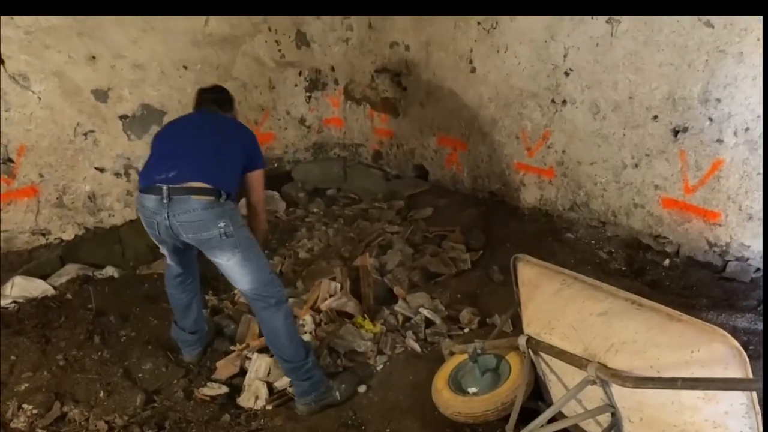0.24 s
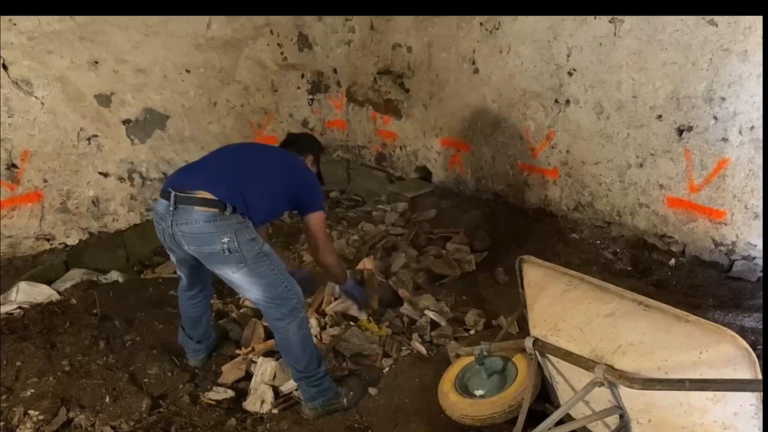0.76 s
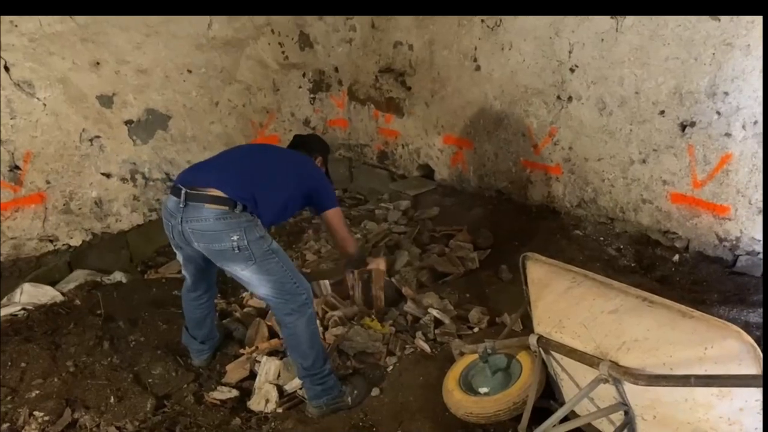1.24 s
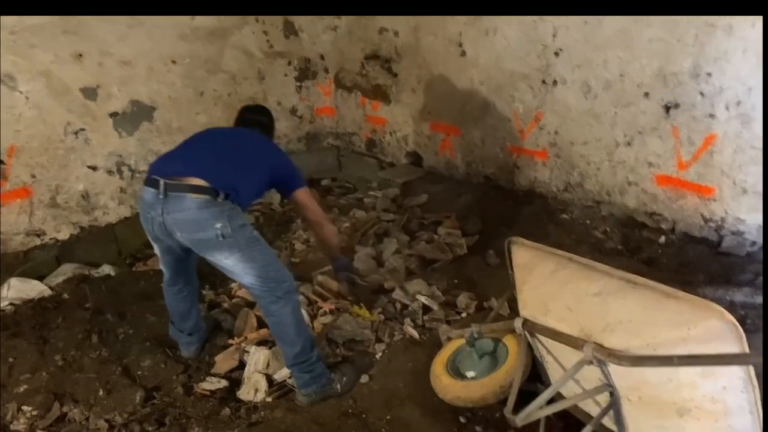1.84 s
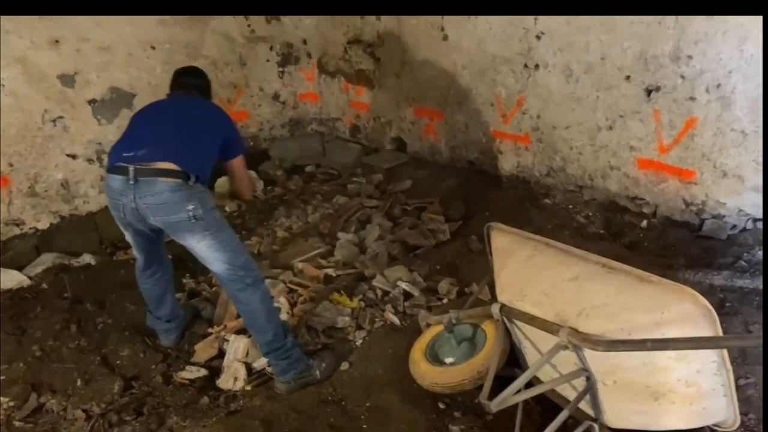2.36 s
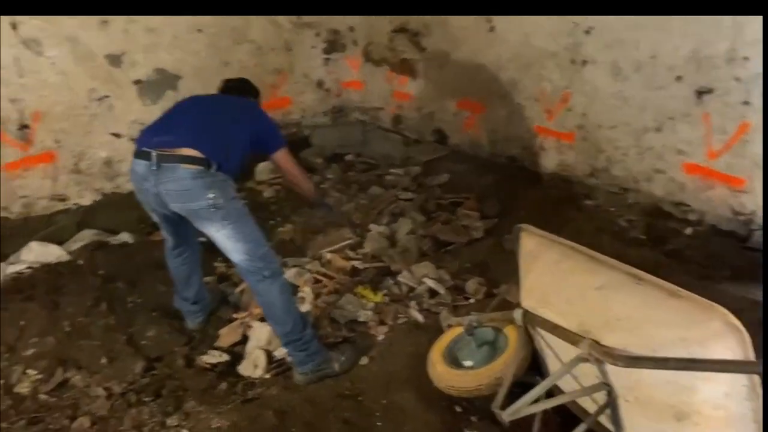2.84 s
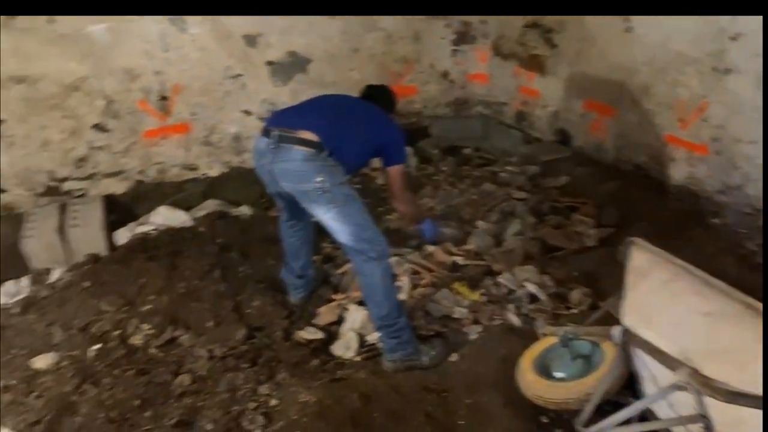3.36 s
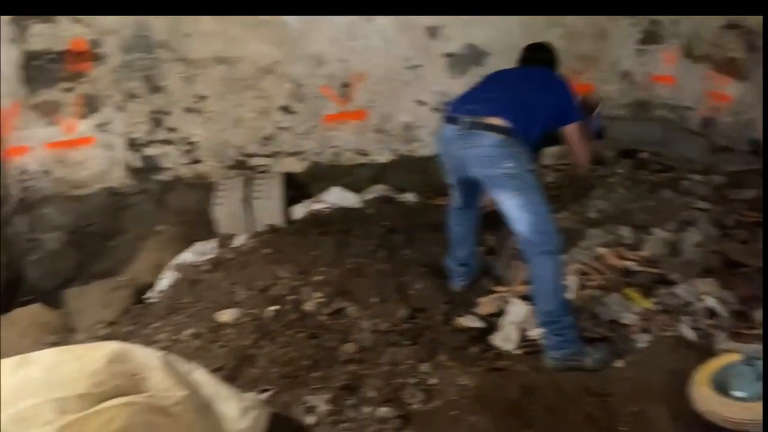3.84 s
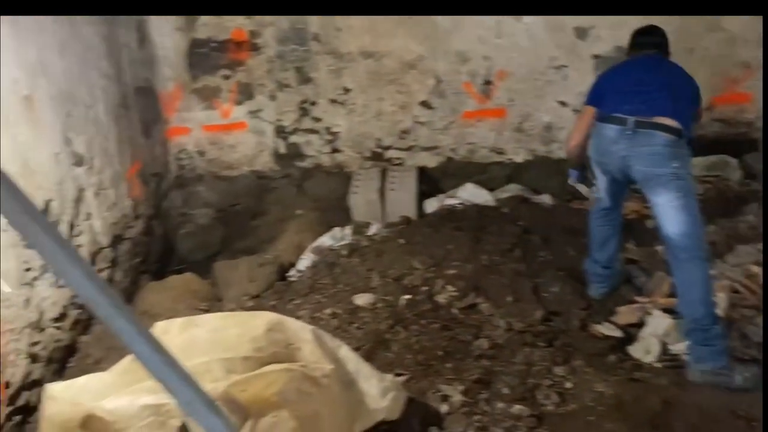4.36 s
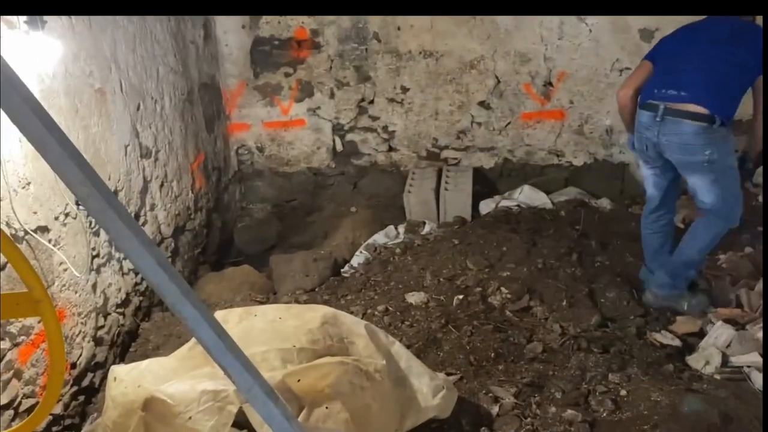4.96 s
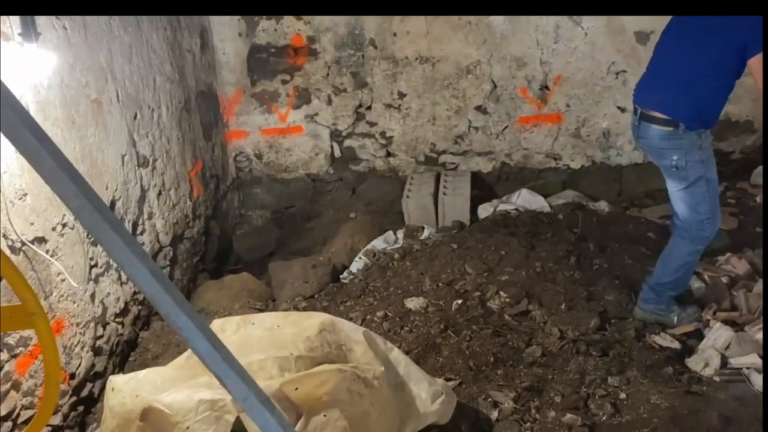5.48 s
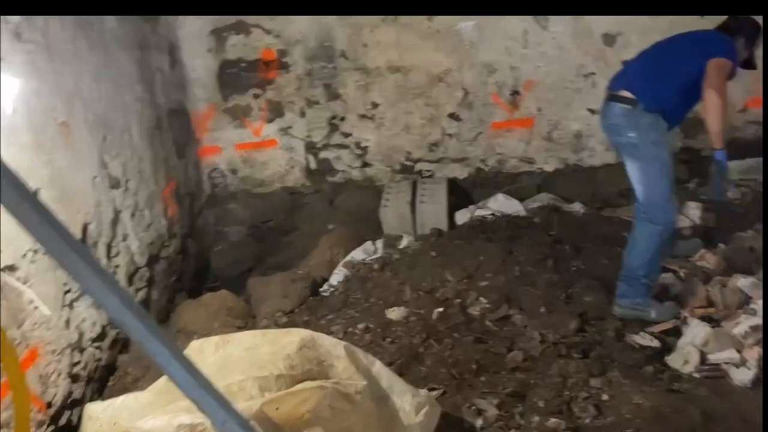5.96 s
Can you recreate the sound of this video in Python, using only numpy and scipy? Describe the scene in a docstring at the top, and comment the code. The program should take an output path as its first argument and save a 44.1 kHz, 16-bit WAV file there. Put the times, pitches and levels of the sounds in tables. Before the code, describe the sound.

In a bare stone-walled cellar, a brick lands with a bright ringing double clack, then hands rake gritty rubble with small clicks and clinks. A flat tile and a slab smack down, softer rummaging follows, two tile pieces clink sharply, a stone cracks down, boots crunch, and a last block hits. Phone microphone, a few metres away, short hard echo.

```python
"""Pieces of brick, tile and stone are thrown onto rubble in a stone-walled room: each grazes, lands, bounces, sets grit
trickling. The worker also knocks pieces together, rakes through the heap and crunches about in boots.
Blows are ringing modes plus a filtered crack and thud; grit is random pebble ticks, sand and sag.
Noise reverberation makes the echo; a phone's two ports with gain control listen."""
import sys
import numpy as np
from scipy import signal
from scipy.fft import rfft, irfft, next_fast_len
from scipy.io import wavfile
from scipy.ndimage import uniform_filter1d, minimum_filter1d

SR = 44100
rng = np.random.default_rng(int(sys.argv[2]) if len(sys.argv) > 2 else 0)


def waveform_to_disk(signal):
    """Save audio, clipped to [-1, 1], as 16-bit WAV at the path in sys.argv[1]."""
    frames = np.transpose(np.atleast_2d(signal))
    scaled = np.clip(frames, -1, 1) * 32767
    samples = np.round(scaled).astype(np.int16)
    wavfile.write(sys.argv[1], SR, samples)


N = 273771
TAIL = 28800  # samples in one echo
T = np.arange(TAIL) / SR


def undb(db):
    """Decibels to amplitude gain."""
    return 10 ** (np.asarray(db) / 20)


def read(table, hz):
    """Interpolate a (frequency, value) table on a log-frequency axis."""
    points, values = np.transpose(table)
    return np.interp(np.log(hz + 1), np.log(points), values)


def bins(size):
    """Spectrum bin frequencies in Hz, kept above zero."""
    return np.maximum(np.arange(size // 2 + 1) * SR / size, 1)


def colour(x, table, tilt_db_per_octave=0):
    """Filter by a spectrum tilted about 2 kHz; minimum phase keeps attacks sharp."""
    size = next_fast_len(x.shape[-1] // 2 + 1024) * 2
    hz = bins(size)
    tilt_db = tilt_db_per_octave * np.log2(np.maximum(hz, 500) / 2000)
    cepstrum = irfft(np.log(undb(read(table, hz) + tilt_db)))
    cepstrum[0] /= 2
    response = np.exp(rfft(2 * cepstrum[:size // 2], size))  # folded cepstrum: minimum phase
    return irfft(rfft(x, size) * response)[..., :x.shape[-1]]


def level(x, db, seconds):
    """Scale x to the energy of a two-channel sound of this RMS level and duration."""
    return x * (undb(db) * np.sqrt(2 * seconds * SR / np.sum(np.abs(x) ** 2)))


def fade(t60_s):
    """Exponential decay, 60 dB in t60_s."""
    return np.exp(-np.log(1000) * T / t60_s)


def add(out, x, start_s):
    """Mix x into out at a time, trimmed to fit."""
    i = int(start_s * SR)
    x = x[:, max(-i, 0):N - i]
    out[:, max(i, 0):max(i, 0) + x.shape[1]] += x


# Still room air: (frequency [Hz], relative density [dB per Hz])
AIR = [(20, -19), (55, -1), (150, -6.5), (400, -11.5), (2000, -21), (6000, -28.5), (10000, -26.5),
       (14000, -42.5)]


def air():
    """Steady coloured noise, partly common to both ports."""
    noise = rng.standard_normal(N) + .5 * rng.standard_normal((2, N))
    return level(colour(noise, AIR), -65, N / SR)


# Reverberation of the stone walls: (frequency [Hz], t60 [s])
WALLS = [(100, 0.54), (400, 0.46), (1000, 0.42), (2500, 0.47), (5000, 0.45), (8000, 0.33), (13000, 0.27)]


def room(direct_db, direct_t60_s=0.016, early_db=-2, early_t60_s=0.098, build_s=0.0049, wide_hz=350, width=0.35):
    """Path from one spot to both ports: direct sound scattered by the heap, near corner, diffuse tail."""
    hz = bins(TAIL)
    wall_hz = np.array(WALLS)[:, 0]
    mid, side = rfft(rng.standard_normal((2, TAIL)))
    # long waves reach both ports alike
    both = mid + width * hz / (hz + wide_hz) * side * np.array([[1], [-1]])
    tail = 0
    for band, (_, t60_s) in zip(np.eye(len(WALLS)), WALLS):
        share = np.interp(np.log(hz), np.log(wall_hz), band)
        tail = tail + irfft(both * share) * fade(t60_s)
    early = irfft(both)[:, ::-1] * fade(early_t60_s)
    build = 1 - np.exp(-(T / build_s) ** 2)
    scatter = rfft(rng.standard_normal(TAIL) * fade(direct_t60_s))
    # smeared in time, only mildly coloured
    direct = irfft(scatter / np.abs(scatter) ** .5) * fade(early_t60_s)
    path = level(direct * np.ones((2, 1)), direct_db, 1 / SR)
    path = path + level(tail * build, 0, 1 / SR)
    return path + level(early * build, early_db, 1 / SR)


def splinters(x, ring_db=-4, t60_s=0.076, low_hz=2500, span_hz=8000, count=36):
    """Small shards around the contact ring along at high, scattered pitches."""
    pitches_hz = low_hz + span_hz * rng.random((count, 1))
    ring = np.sum(np.sin(2 * np.pi * pitches_hz * T), axis=0) * fade(t60_s)
    ring = level(ring, ring_db, 1 / SR / 2)
    return x + signal.fftconvolve(x, ring[None], axes=1)[:, :x.shape[1]]


# Spectrum of a stone contact: (frequency [Hz], relative density [dB per Hz])
CRACK = [(60, -37.5), (200, -12), (400, -12), (650, -3.5), (1000, 6), (2000, -1.5), (3200, -1.5),
         (5000, -6.5), (7000, -12), (9500, -7.5), (11200, -4), (13000, -62.5)]


def crack(contacts, tilt_db_per_octave):
    """Contacts and their splinters, filtered to the stone-contact spectrum."""
    return colour(splinters(contacts), CRACK, tilt_db_per_octave)


# Spectrum of the heap giving way under weight: (frequency [Hz], relative density [dB per Hz])
THUD = [(20, -43), (50, -13.5), (90, -6.5), (170, 0.5), (280, -1.5), (500, -4.5), (1000, -20.5),
        (4000, -61.5)]


def thud(contacts):
    """Contacts filtered to the low sag of the heap."""
    return colour(contacts, THUD)


def scuff(seconds, grit_db, centre_hz, weight_db, rate_hz=240, spread_db=6.0, octaves=.55, cycles=26,
          sand_db=-4, sand_tilt_db=0.7, size=2048):
    """Pebbles tick against each other, each at its own pitch, while sand crackles and the heap sags."""
    length = int(seconds * SR)
    pebbles, ticks = np.zeros((2, length + size))
    t = T[:size]
    for when, pitch, force in rng.random((int(rate_hz * seconds), 3)):
        i = int(when * length)
        gain = undb(-spread_db * np.log(0.045 + force))
        hz = np.clip(centre_hz * (pitch / (1 - pitch)) ** (octaves / 2), 100, SR / 6)
        decay = np.exp(-np.log(1000) * t * hz / cycles)  # t60 is a fixed number of cycles
        pebbles[i:i + size] += gain * np.sin(2 * np.pi * hz * t) * decay * np.sqrt(hz)
        ticks[i] += gain * rng.choice([-1, 1])
    band = signal.butter(3, [centre_hz / 10, SR / 5], "band", fs=SR, output="sos")
    pebbles = signal.sosfilt(band, pebbles)
    path = room(direct_db=-3.5)
    pebbles, ticks = (signal.fftconvolve(x[None], path, axes=1) for x in (pebbles, ticks))
    sand = crack(ticks, sand_tilt_db * np.log2(centre_hz / 2400))
    out = level(pebbles, grit_db, seconds) + level(sand, grit_db + sand_db, seconds)
    return out + level(thud(ticks), weight_db, seconds)


SOLE_SAND_DB = 5  # sand over pebbles: soles crush more sand than they roll pebbles
# Boots on the rubble: (time [s], grit level [dB], weight level [dB])
STEPS = [(4.176, -57.5, -55), (4.988, -44, -44.5), (5.635, -53.5, -50)]


def boots(step_hz=2203, tread_s=0.098, roll_s=.18, roll_db=-12):
    """Each step crunches as the sole comes down, then more softly as the weight rolls forward."""
    out = np.zeros((2, N))
    for start_s, grit_db, weight_db in STEPS:
        tread = scuff(tread_s, grit_db, step_hz, weight_db, sand_db=SOLE_SAND_DB)
        roll = scuff(roll_s, grit_db + roll_db, step_hz, weight_db + roll_db / 2, sand_db=SOLE_SAND_DB)
        add(out, tread, start_s)
        add(out, roll, start_s + tread_s)
    return out


FIRM_DB = -28.5  # reference level of a firm stroke or knock
RAKE_WEIGHT_DB, RAKE_PRESS = -50.5, .4  # sag at a firm stroke of RAKE_HZ; dB of sag per dB of grit
RAKE_HZ, RAKE_DEPTH_DB = 1500, 5  # deeper strokes weigh more: dB per octave below RAKE_HZ
# Hands raking through rubble, plus one short crunch underfoot at 3.636 s: (time [s], duration [s], grit level
# [dB], centre frequency [Hz])
RAKES = [(0.818, 0.075, -57.5, 3500), (0.904, 0.32, -40.5, 2206), (1.281, 0.12, -33.5, 2200),
         (1.449, 0.15, -46, 1500), (1.589, .1, -36.5, 1203), (1.69, 0.14, -33, 996),
         (1.841, 0.3, -38.5, 1283), (2.13, .16, -37, 1005), (2.348, .15, -35.5, 1100),
         (2.985, .33, -48, 2190), (3.31, .29, -58.5, 2520), (3.636, 0.068, -40, 643),
         (3.929, .1, -60, 5220)]


def rakes():
    """Hands stir grit, and one boot crunches briefly; louder and lower strokes press the heap harder."""
    out = np.zeros((2, N))
    for start_s, seconds, grit_db, centre_hz in RAKES:
        press_db = RAKE_PRESS * (grit_db - FIRM_DB)
        depth_db = RAKE_DEPTH_DB * np.log2(RAKE_HZ / centre_hz)
        add(out, scuff(seconds, grit_db, centre_hz, RAKE_WEIGHT_DB + press_db + depth_db), start_s)
    return out


def radiate(mode_hz, hz, soft_hz=8500):
    """A small body radiates little below its own pitch; a gritty contact rounds off the very top."""
    return hz ** 2 / (hz ** 2 + mode_hz ** 2) / (1 + (hz / soft_hz) ** 8)


def exposure_db(rattle_s, top_db=2, slope_db=2.8):
    """Direct level: clean taps sit on top of the heap, long rattles sink between the stones."""
    return top_db - slope_db * np.log2(max(rattle_s, .001) / .001)


# Ringing modes by piece: (frequency [Hz], relative level [dB], t60 [s])
PIECES = { "brick": [(624, -8, 0.13), (701, -7, 0.16), (1405, -9, 0.25), (1560, -19.5, .06),
          (1751.6, 6, 0.17), (1690, -3.5, .15), (2236, -0.5, 0.07), (2692, -7.5, 0.09), (2760, -4.5, 0.064),
          (3575, -8, .12), (4220, -4, 0.096), (5280, -17.5, 0.15), (7010, -8, 0.071)],
          "tile": [(1094, -2.5, 0.33), (1748, -6.5, 0.22), (2070, -11, 0.046), (2290, -13.5, .06),
          (2360, -17.5, 0.1), (3000, -15, 0.11), (4230, -15, 0.097), (5140, -26.5, 0.11), (6570, -30, .1)],
          "tile_flat": [(825, -19, .05), (900, -13, 0.11), (1091, -5, 0.086), (1660, -17.5, .07),
          (1790, -15.5, .07), (2630, -16.5, 0.12), (4140, -20, .09), (5500, -26.5, .1)],
          "slab": [(626, -1, 0.12), (797.5, 5.5, 0.064), (1180, -20.5, 0.043), (1530, -5, 0.058),
          (1643, -6, 0.09), (2810, -1.5, 0.099), (3730, -29, .07), (3970, 3, .15), (4200, -24, 0.13),
          (6630, 2, 0.076), (8820, 1, 0.38)], "stone": [(880, -7, 0.026), (1147, 2, 0.039), (1950, 0, 0.11),
          (2110, 2, .05), (2495, 9, 0.02), (2296, -3, .06), (3210, -2, 0.044), (3508, -12, 0.038),
          (4770, -26, .05)], "block": [(645, 1, 0.11), (900, 3, 0.31), (1030, 2, 0.037), (1890, -26, 0.13),
          (1910, 5, 0.057), (2700, -5, 0.099), (2948, 8, 0.06), (3330, 6, 0.065), (3373, -6, 0.13),
          (4300, -5, .14), (4680, -5, 0.077), (4650, 1, 0.069)], "wedge": [(842, 3.5, 0.032),
          (1515, 6.5, 0.037), (1766, 0, 0.048), (3770, -1, 0.23), (6492, -33, .1)],
          "plate": [(745, -6, 0.1), (931.6, 7, 0.12), (1744, -7.5, 0.066), (1920, -8.5, .08),
          (2840, -6.5, 0.13), (5200, -32, 0.087)], "shard": [(890, -7, .03), (1337, -4.5, .03),
          (1908, 6, 0.047), (2201, 8, 0.071), (2623, 8.5, 0.057), (3960, -4, .05)],
          "sliver": [(980, -12, 0.024), (1700, 1, .02), (2392, 9.5, 0.036), (3040, 4, 0.055),
          (3510, 8.5, 0.22), (4210, -1.5, 0.13)], "flake": [(1067, 1, 0.18), (2330, 7, .05),
          (2660, 12, 0.1), (5729, 1, .1), (6460, -4.5, .12)], "chip": [(2369, 9.5, 0.16), (7500, -6, 0.13),
          (9300, -7, 0.136)], "clod": [(436, -1, 0.054), (557, -8, 0.12), (620, 6.5, 0.037),
          (1010, -7, 0.024)]}


def blow(piece, crack_db, ring_db, thud_db, tilt_db_per_octave, rattle_s,
         rebound=0.41, clack=1.2, clack_t60_s=0.051, count=6):
    """A piece lands and rocks on its corners: each contact cracks and rings it, and the heap thuds."""
    contacts = np.zeros(TAIL)
    contacts[0] = 1
    when = rng.random(count)
    late = (2 * when * rattle_s * SR).astype(int) + 1
    contacts[late] += rebound * rng.standard_normal(count) * np.exp(-when)
    heard = rfft(room(exposure_db(rattle_s))) * rfft(contacts)
    damped = clack * fade(clack_t60_s)  # touching the heap takes much of the ring at once
    ring = 0
    for hz, db, t60_s in PIECES[piece]:
        mode = rfft(np.sin(2 * np.pi * hz * T) * (damped + fade(t60_s))) * radiate(hz, bins(TAIL))
        ring = ring + level(heard * mode, db, 1)
    contact = irfft(heard)
    out = level(crack(contact, tilt_db_per_octave), crack_db, .05)
    out = out + level(irfft(ring), ring_db, .05) + level(thud(contact), thud_db, .05)
    return out * np.minimum(10 * (T[-1] - T), 1)  # the echo dies into silence


BRIGHTEN = 0.19  # harder blows are brighter: dB per octave per dB above FIRM_DB
EDGE_TILT = 0.2  # edge-on blows are brighter: dB per octave per dB of extra crack
# Contact by piece: (crack over ring [dB], thud over ring [dB], treble tilt at FIRM_DB [dB per octave])
SURFACES = {"brick": (-4, -25, 0.96), "tile": (-22.5, -29.5, 0.85), "tile_flat": (-12.5, -23, -2.9),
            "slab": (4.4, -14.5, -1.9), "stone": (7.27, -8, -1.1), "block": (1.9, -25.5, -2.4),
            "wedge": (-14.5, -16.5, 6.2), "plate": (-9.5, -10, 0), "shard": (-9, -28.5, -5),
            "sliver": (-2.3, -26.5, -7.5), "flake": (-2, -13, 7.2), "chip": (-5.5, -12, 8.5),
            "clod": (-11, -12.5, -1)}


def knock(piece, ring_db, rattle_s, edge_db=0):
    """One blow: the surface sets crack and thud; force and an edge-on contact brighten it."""
    crack_db, thud_db, tilt = SURFACES[piece]
    tilt = tilt + BRIGHTEN * (ring_db - FIRM_DB) + EDGE_TILT * edge_db
    return blow(piece, ring_db + crack_db + edge_db, ring_db, ring_db + thud_db, tilt, rattle_s)


# Pieces knocked in the hands, or tipping over on the heap or under a boot:
# (time [s], piece, ring level [dB], mean rattle delay [s], extra edge crack [dB])
KNOCKS = [ (0.174, "brick", -9.5, .014, -5.5), (0.903, "stone", -54, 0.00077, 4),
          (.993, "sliver", -42.5, 0.0016, 1), (1.076, "flake", -51.5, .001, 7.5),
          (1.145, "shard", -35.5, 0.00095, -9), (1.224, "shard", -29, .001, 0),
          (1.303, "stone", -41, 0.019, -3.5), (1.389, "stone", -37, 0.0009, -4),
          (1.713, "stone", -35, 0.0087, -7.5), (1.803, "sliver", -24, 0.0038, -2.5),
          (1.933, "shard", -32, .001, 4), (1.942, "shard", -31, .001, -1), (2.03, "sliver", -35, 0.013, -7),
          (2.128, "shard", -22, 0.00073, 5.5), (2.199, "tile", -19.5, 0.00098, 3),
          (3.064, "wedge", -34, 0.0019, 4.5), (3.146, "wedge", -35, .003, 1),
          (3.305, "plate", -45.5, 0.0013, -12), (3.404, "plate", -41, .008, 1),
          (3.615, "clod", -44.5, 0.0027, 3), (3.638, "clod", -36.5, .006, -6),
          (3.735, "plate", -37.5, 0.0021, 6), (3.737, "flake", -37, .003, -3),
          (3.790, "shard", -39, .008, -4.5), (3.847, "plate", -43, 0.0029, 2),
          (3.889, "plate", -43.5, .004, -1), (4.062, "flake", -38, 0.0038, -0.5),
          (4.176, "stone", -50, 0.0033, 4), (4.431, "tile", -22, 0.0028, 1),
          (4.447, "tile", -15, 0.0028, -2), (4.988, "stone", -48, 0.0054, -1.5),
          (5.042, "flake", -51.5, .005, 8.5), (5.226, "chip", -37, .001, -6)]


def knocks():
    """Larger pieces strike each other, each ringing at its own modes."""
    out = np.zeros((2, N))
    for start_s, *settings in KNOCKS:
        add(out, knock(*settings), start_s)
    return out


SWING_S, SWING_DB, SWING_HZ, SWING_WEIGHT_DB = 0.11, -62, 1500, -58.5  # boots twist before a throw
GRAZE_DB, GRAZE_EDGE_DB = -26, 9  # ring against the landing, extra crack: a corner touches first
BOUNCE_DB, BOUNCE_EDGE_DB = -10, 2.5  # ring against the landing, extra crack
SETTLE_AFTER_S, SETTLE_S, SETTLE_HZ = .15, .17, 2160
SETTLE_DB, SETTLE_WEIGHT_DB = -36, -60.5  # grit against the landing's crack; sag
# Pieces thrown onto the heap:
# (time [s], piece, ring level [dB], mean rattle delay [s], graze lead [s], bounce delay [s])
THROWS = [(0.118, "brick", -9.5, .003, .016, 0.019), (2.317, "tile_flat", -14, .005, 0.00065, .015),
          (2.825, "slab", -13.5, 0.0082, 0.0075, 0.015), (4.545, "stone", -15.5, .008, 0.00089, .011),
          (5.913, "block", -12.5, 0.0041, .005, 0.011)]


def throws():
    """Boots twist on grit; the piece grazes the heap, lands, bounces once, and grit trickles down."""
    out = np.zeros((2, N))
    for start_s, piece, ring_db, rattle_s, graze_s, bounce_s in THROWS:
        swing = scuff(SWING_S, SWING_DB, SWING_HZ, SWING_WEIGHT_DB, sand_db=SOLE_SAND_DB)
        graze = knock(piece, ring_db + GRAZE_DB, graze_s / 2, GRAZE_EDGE_DB)
        landing = knock(piece, ring_db, rattle_s)
        bounce = knock(piece, ring_db + BOUNCE_DB, rattle_s, BOUNCE_EDGE_DB)
        crack_db = ring_db + SURFACES[piece][0]
        settle = scuff(SETTLE_S, crack_db + SETTLE_DB, SETTLE_HZ, SETTLE_WEIGHT_DB)
        add(out, swing, start_s - SWING_S)
        add(out, graze, start_s - graze_s)
        add(out, landing, start_s)
        add(out, bounce, start_s + bounce_s)
        add(out, settle, start_s + SETTLE_AFTER_S)
    return out


def scene():
    """Footsteps, raking, knocks and throws over the quiet room."""
    return air() + boots() + rakes() + knocks() + throws()


# Level balance of the ports: (frequency [Hz], left minus right [dB])
EARS = [(60, -2), (110, -1.5), (200, -4), (360, -8.5), (670, -10), (1220, -0.5), (2220, -0.5), (4050, -1.5),
        (7390, 0), (13500, 0)]
# Phase between the ports: (frequency [Hz], lead of the left port [rad])
PORT_PHASE = [(0, -3.5), (430, 1.5), (690, 1.45), (1720, 0.5), (3010, 2), (3790, 1.46), (4700, 2.32),
              (5860, 0.3), (11800, 4)]


def microphones(x, long_hz=500):
    """Two ports in the phone's body hear each pitch at a slightly different level and phase."""
    size = 2 * next_fast_len(N // 2 + TAIL)
    hz = bins(size)
    gains = undb(read(EARS, hz) * np.array([[.5], [-.5]]))
    short = 1 - np.exp(-(hz / long_hz) ** 4)  # long waves arrive in step
    lag_rad = short * np.interp(hz, *np.transpose(PORT_PHASE)) * np.array([[0], [1]])
    return irfft(rfft(x, size) * gains * np.exp(-1j * lag_rad))[:, :N]


def gain_control(x, threshold_db=-18, slope=0.53, hold_s=0.14, glide_s=0.017, size=220):
    """Loud blows turn the gain down; the cut is held a moment, then glides back."""
    power = uniform_filter1d(np.mean(x ** 2, axis=0), size)
    loud_db = 10 * np.log10(np.maximum(power, 1e-12))
    cut_db = -slope * np.maximum(loud_db - threshold_db, 0)
    half = int(hold_s * SR / 2)
    held_db = minimum_filter1d(cut_db, 2 * half + 1, origin=half, mode="constant")
    step = 1 / (glide_s * SR)
    return x * undb(signal.lfilter([step], [1, step - 1], held_db))


def record(dry, ceiling=1.05, top_hz=13800):
    """Two ports, gain control, rounded peaks and a steep top cut."""
    x = ceiling * np.tanh(gain_control(microphones(dry)) / ceiling)
    return signal.sosfilt(signal.ellip(8, .2, 80, top_hz, fs=SR, output="sos"), x)


dry = scene()
out = record(dry)
waveform_to_disk(out)
```